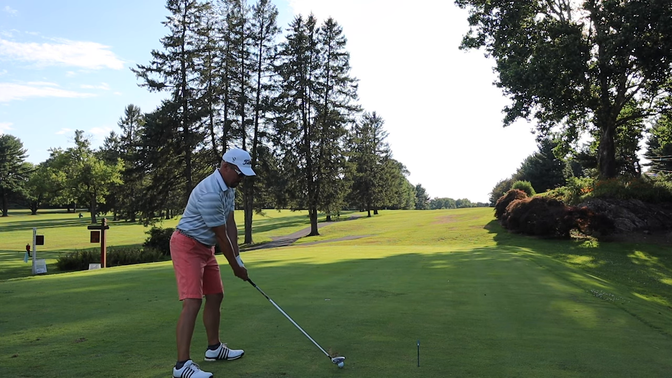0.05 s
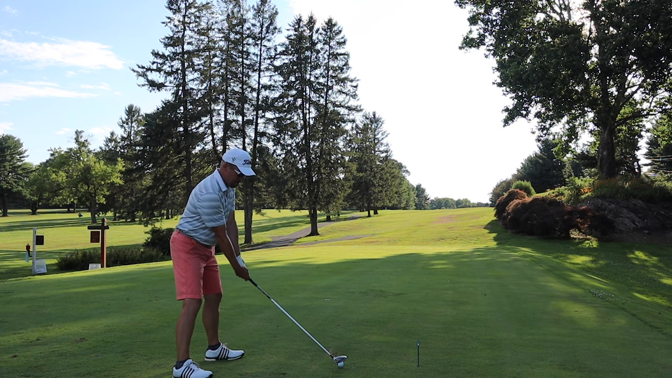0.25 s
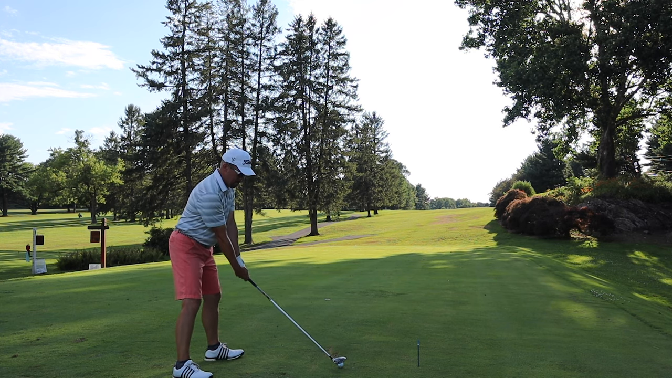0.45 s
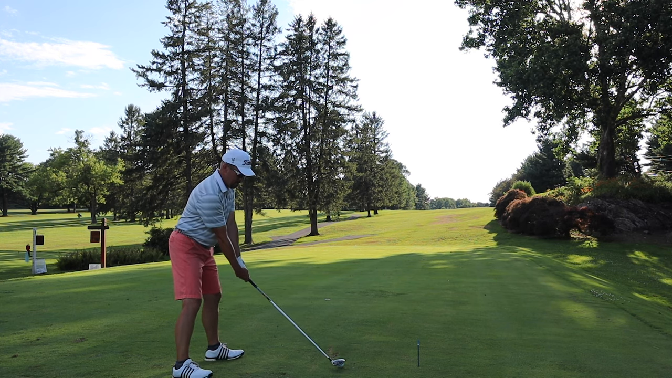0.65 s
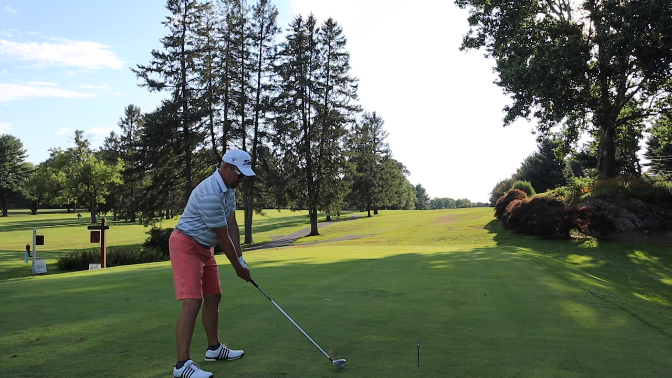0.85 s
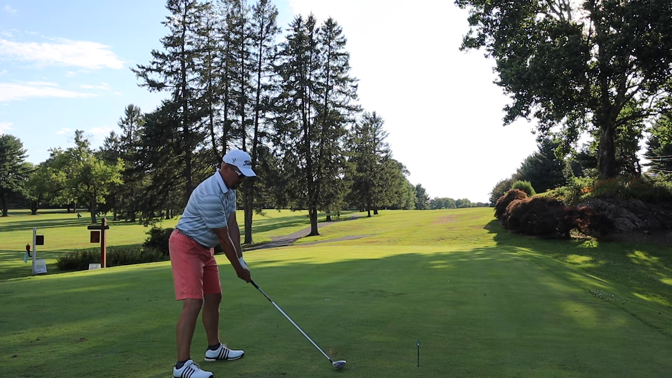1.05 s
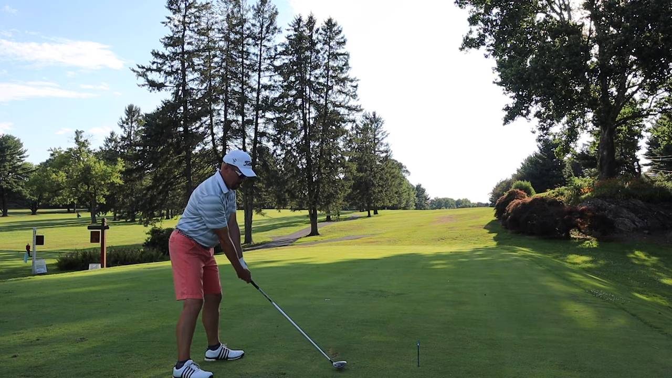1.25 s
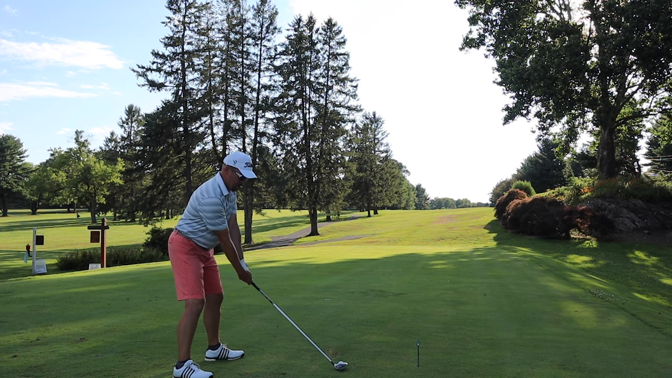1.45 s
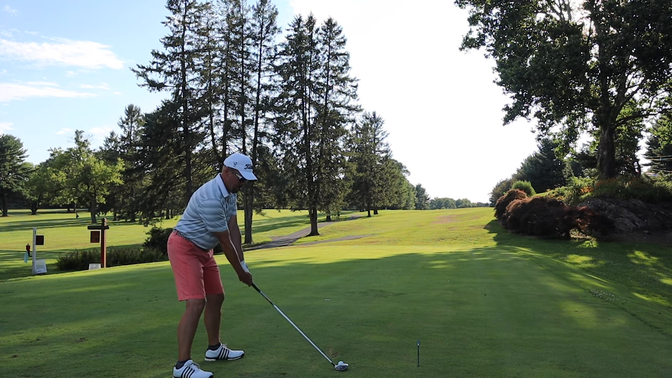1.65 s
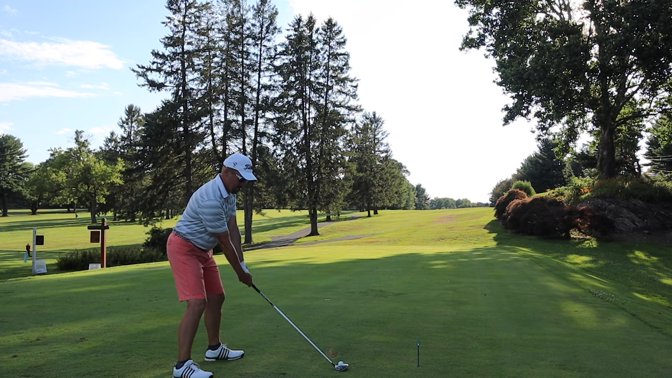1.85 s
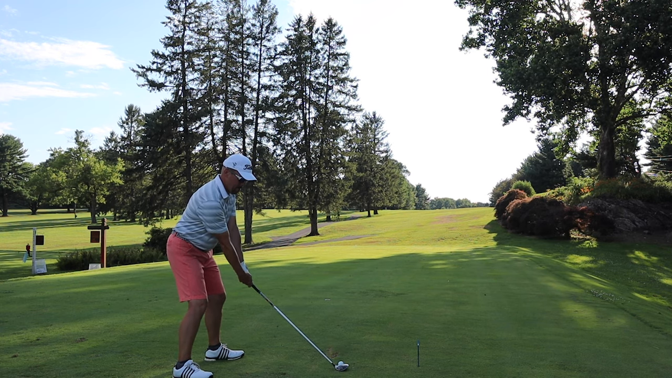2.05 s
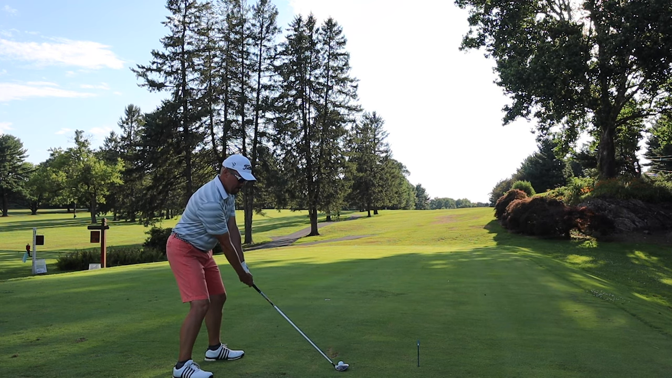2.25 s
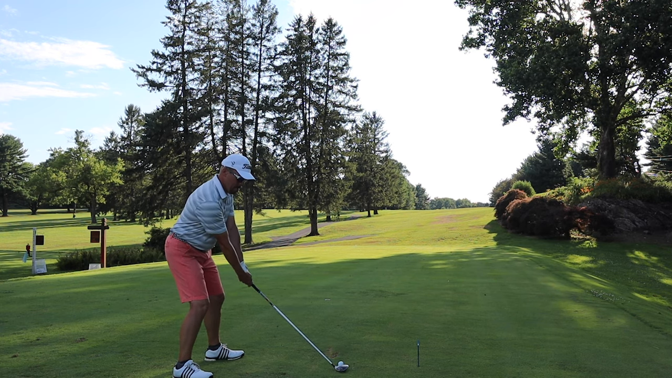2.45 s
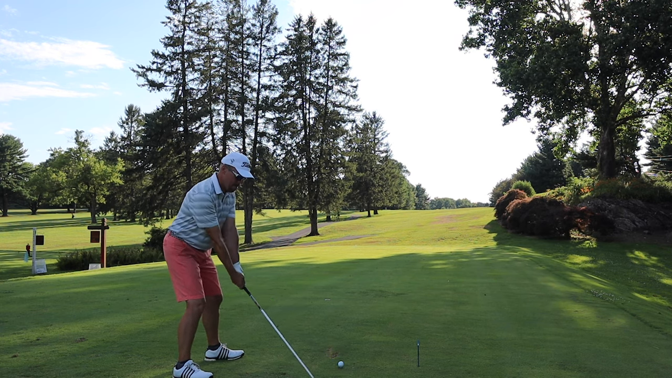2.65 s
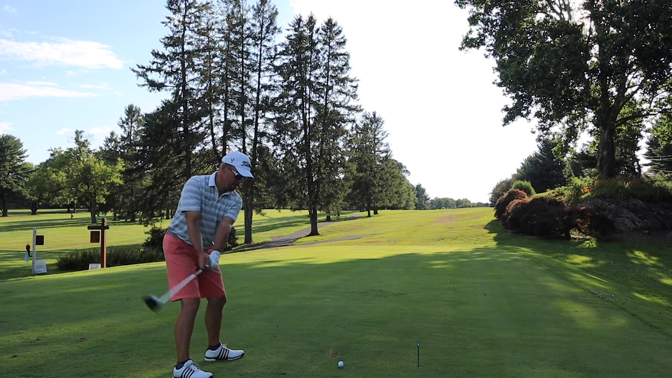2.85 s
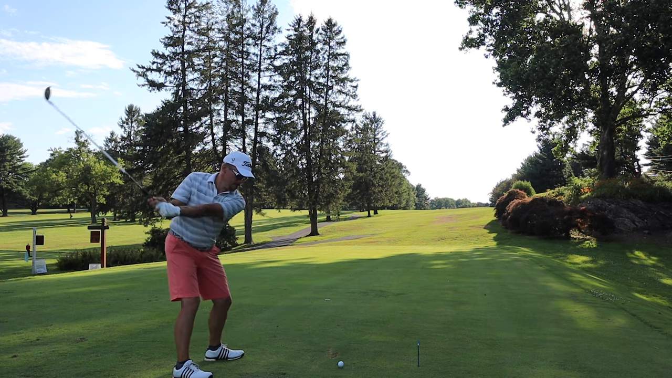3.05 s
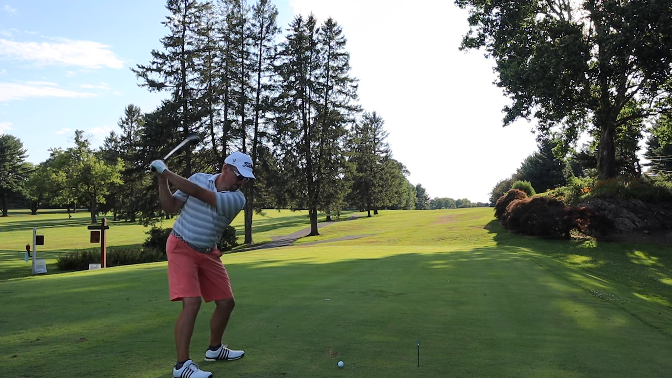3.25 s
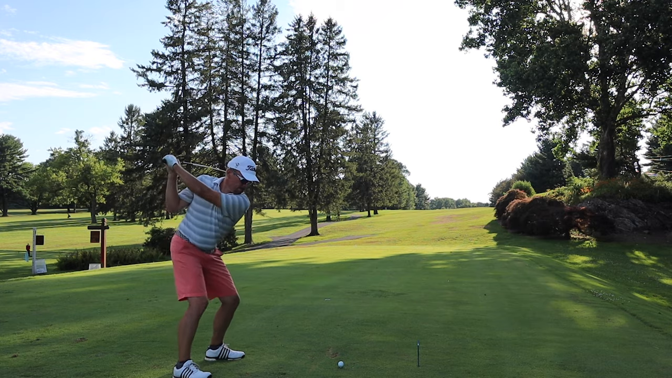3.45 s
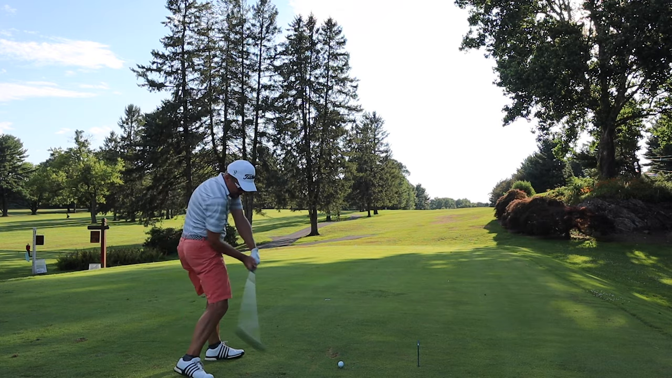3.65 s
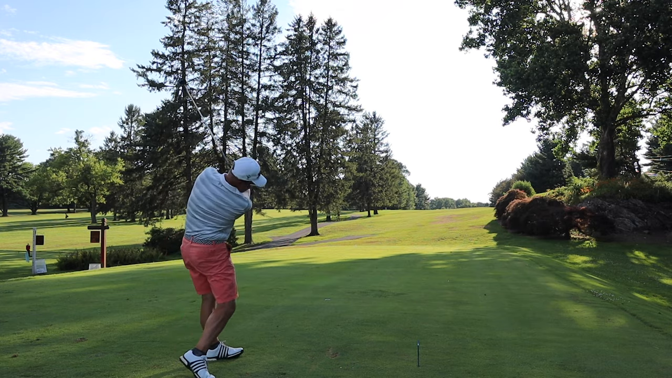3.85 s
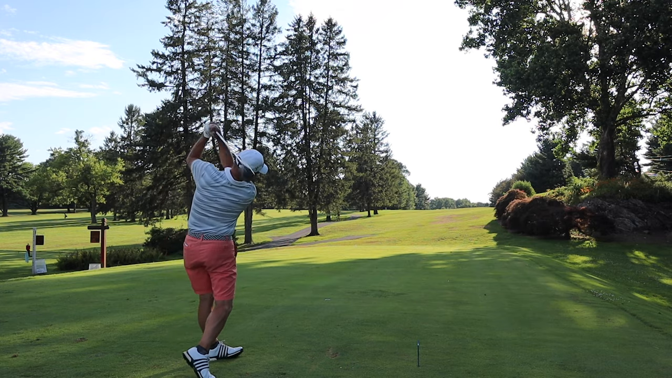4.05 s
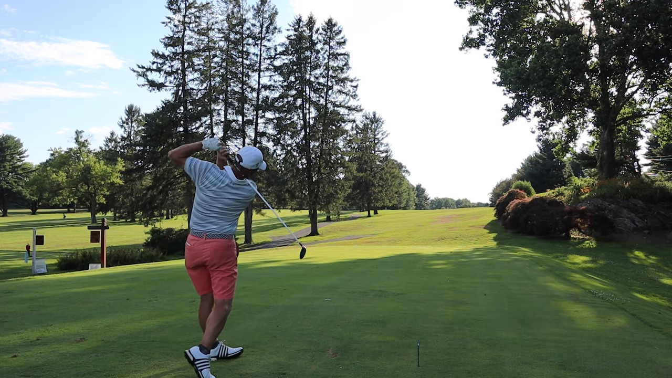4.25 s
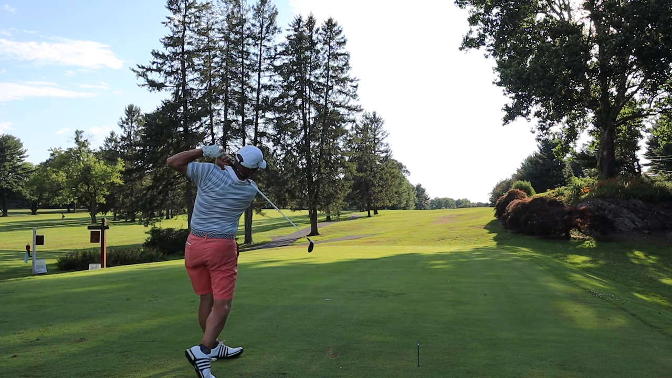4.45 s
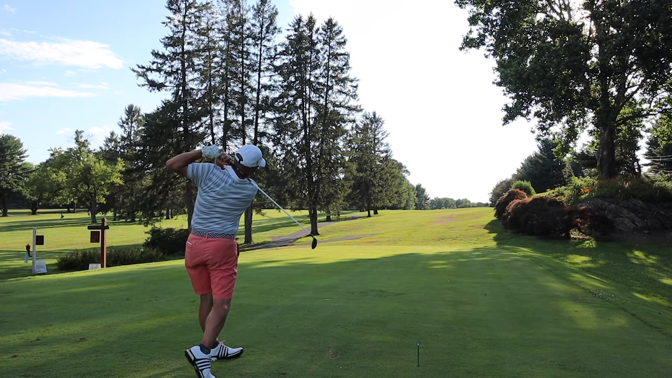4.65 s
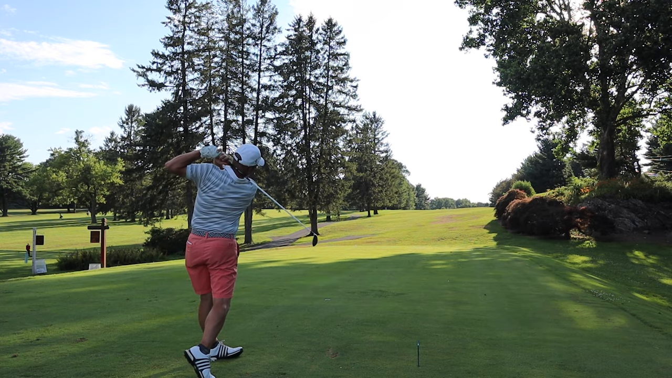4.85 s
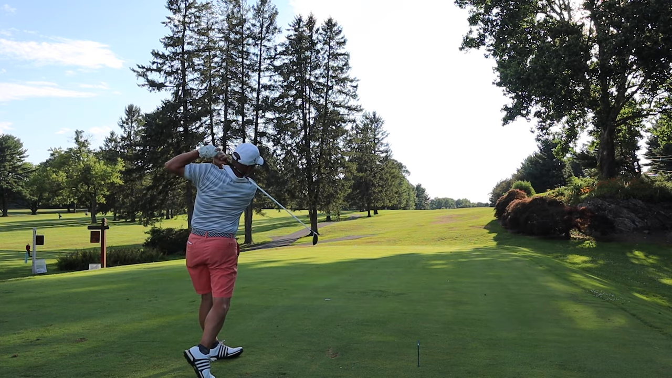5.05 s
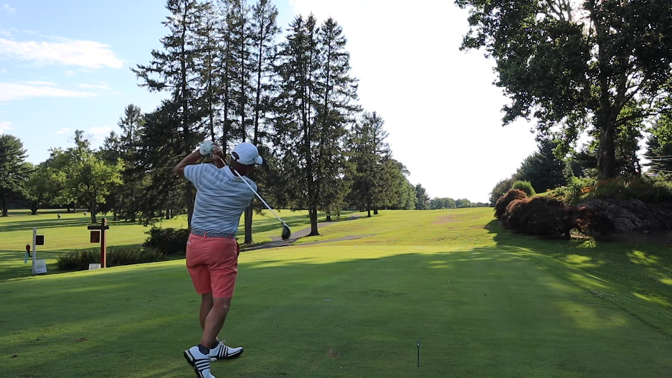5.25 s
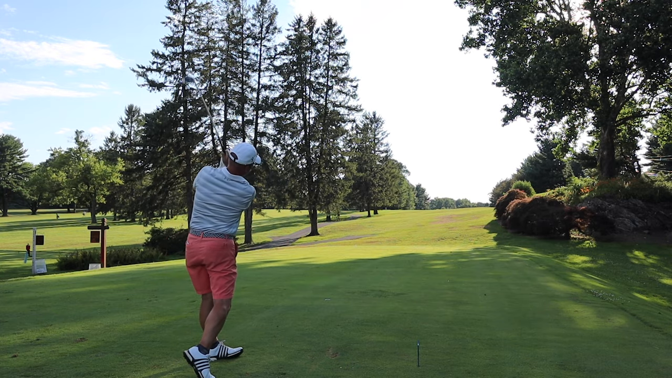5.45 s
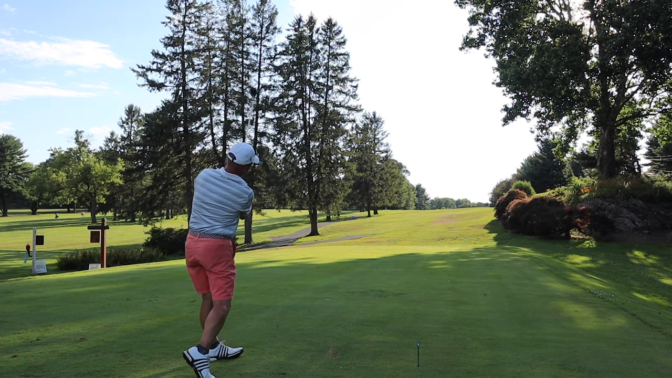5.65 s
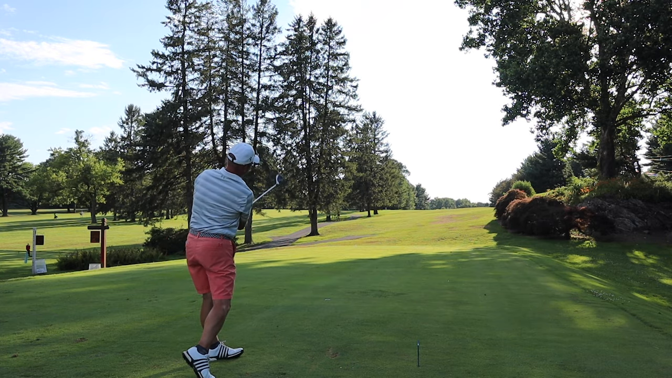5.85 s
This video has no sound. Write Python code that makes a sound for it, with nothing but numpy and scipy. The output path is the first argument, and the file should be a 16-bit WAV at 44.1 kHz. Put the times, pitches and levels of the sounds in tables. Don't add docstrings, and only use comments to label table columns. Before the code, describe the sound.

A quiet open golf course, heard through a camera microphone a few metres from the player. A soft, low-heavy wash of distant traffic and slight hiss runs throughout. Far birds chirp faintly, with one nearer kind giving slurred, downward whistles of about 0.3 seconds at 0.4, 0.8, 1.0 and 1.4; a quick bright chirp also comes near 1.5. At 1.2 the club head taps the turf with a tiny double bounce and dull ring. From 1.6 to 3.3 a faint far engine wavers upward in pitch, then disappears. A dry tick of shoes or clothes comes at 3.3. Around 3.72 a whistling swish rises rapidly, ending at 3.8 in a very loud, sharp crack with short, bright metallic ringing. Trees return a crisp scattered echo lasting a few tenths of a second, while the background ducks momentarily. A slurred whistle follows at 3.9, another at 4.8, with small chirps and a faint tick near 5.6.

```python
import sys
import numpy as np
from scipy import signal
from scipy.io import wavfile
from scipy.ndimage import uniform_filter1d

SR = 44100
rng = np.random.default_rng(int(sys.argv[2]) if len(sys.argv) > 2 else 0)


def volts(x):
    e = np.asarray(x, float) / 20
    return 10 ** e


def wrap_up_sound(samples):
    columns = np.atleast_2d(samples).T
    tamed = np.clip(columns, -1, 1)
    steps = np.round(tamed * 32767).astype(np.int16)
    wavfile.write(sys.argv[1], SR, steps)


N = 260631
BLOW_S = 3.8078


def evened(x):
    return x / np.sqrt(np.mean(x ** 2) + 1e-20)


def wander(length, size):
    once = uniform_filter1d(rng.standard_normal(length), size=size)
    return evened(uniform_filter1d(once, size=size))


def read(points, hz):
    f, value = np.transpose(points)
    return np.interp(np.log(hz + 1), np.log(f + 1), value)


def curves(rows):
    s, *columns = np.transpose(rows)
    t = np.arange(s[0], s[-1], 1 / SR)
    return s[0], [np.interp(t, s, c) for c in columns]


def add(mix, s, sound):
    part = mix[round(s * SR):][:len(sound)]
    part += sound[:len(part)]


def colour(points):
    hz = abs(np.fft.fftfreq(4096, 1 / SR))
    log_gain = np.log(volts(np.maximum(read(points, hz), -90)))
    return np.fft.ifft(np.exp(np.conj(signal.hilbert(log_gain)))).real[:2048]


def resonate(x, hz, width_hz):
    turn = np.exp(2j * np.pi * np.cumsum(hz * np.ones(len(x))) / SR)
    r = np.exp(-np.pi * width_hz / SR)
    return 2 * (turn * signal.lfilter([1 - r], [1, -r], x / turn)).real


def ring(modes, rise_s):
    t = np.arange(4000) / SR
    sound = 0
    for k, (hz, db, t60) in enumerate(modes):
        sound = sound + (-1) ** k * volts(db - 60 * t / t60) * np.sin(2 * np.pi * hz * t)
    sound = sound * (1 - np.exp(-(t / rise_s) ** 2))
    return sound / abs(sound).max()


# (frequency [Hz], level [dB per Hz])
WASH_SPECTRUM = [(12, -61), (20, -36), (26, -34), (43, -28), (90, 1), (192, -4.5), (247, -8.5), (284, -8.5),
                 (356, -16), (387, -11), (1250, -12.5), (3140, -25), (3930, -28.5), (6690, -30),
                 (15900, -38.5)]


def wash(level_db=-60, patchy_db=1.12, swell_db=0.18):
    frames, hz = N // 256 + 5, np.fft.rfftfreq(1024, 1 / SR)
    a, b, patches = rng.standard_normal((frames, 513, 3)).T
    patches = uniform_filter1d(patches, size=10, axis=0)
    patches = evened(uniform_filter1d(patches, size=14, axis=1))
    swell = evened(uniform_filter1d(rng.standard_normal(frames), size=40))
    level = read(WASH_SPECTRUM, hz)[:, None] + patchy_db * patches + swell_db * swell
    noise = signal.istft((a + 1j * b) * volts(level), nperseg=1024, noverlap=768)[1][:N]
    return volts(level_db) * evened(noise)


# (time [s], firing rate [Hz], level [dB])
ENGINE_RUN = [
    (1.6, 161, -77),
    (2.05, 168, -68),
    (2.4, 183, -73),
    (2.8, 196, -70),
    (3.15, 204.8, -71),
    (3.3, 205, -88),
]


def engine():
    s, (hz, db) = curves(ENGINE_RUN)
    hz = hz * (1 + 0.018 * wander(len(hz), size=3000))
    level = np.sqrt(2) * volts(db + 5.3 * wander(len(hz), size=2500))
    return s, level * np.sin(2 * np.pi * np.cumsum(hz) / SR)


def bird(s, hz, db):
    flutter_db = 2.6 * wander(16000, size=350)
    fade = signal.windows.tukey(len(hz), min(.35, 2000 / len(hz)))
    note = volts(db + flutter_db[:len(hz)]) * np.sin(2 * np.pi * np.cumsum(hz) / SR) * fade
    leaves = rng.standard_normal(6000) * volts(-60 * np.arange(6000) / SR / .35)
    echo = signal.oaconvolve(note, leaves / np.linalg.norm(leaves))
    echo = volts(-5.5) * echo / np.linalg.norm(echo) * np.linalg.norm(note)
    add(echo, 0, note)
    return s, np.sqrt(2) * echo


def chirp(s, length, first_hz, last_hz, db):
    u = np.linspace(0, 1, round(length * SR))
    bend = 3.5 if last_hz > first_hz else 1
    return bird(s, last_hz + (first_hz - last_hz) * (1 - u) ** bend, db)


def chatter(count=40, level_db=-85):
    calls = []
    for when, pitch, turn, length, loud in rng.random((count, 5)):
        hz = 2500 + 1700 * pitch ** 1.5
        glide = 1 + .25 * (turn - .6)
        calls.append(chirp(when * N / SR, 0.022 + 0.06 * length, hz, hz * glide, level_db + 2.9 * loud))
    return calls


# (time [s], length [s], first pitch [Hz], last pitch [Hz], level [dB])
CHIRP_CALLS = [(0.036, .04, 4780, 4650, -79), (0.18, 0.017, 3220, 3260, -79), (0.5, 0.02, 6810, 6740, -72),
               (0.569, .019, 6200, 6840, -70.5), (.62, .045, 4450, 4250, -81),
               (.663, 0.044, 4040, 4000, -78), (1.471, 0.016, 5080, 6340, -60.5),
               (1.475, .022, 7430, 7450, -68.5), (1.52, 0.025, 7430, 7480, -86),
               (1.60, .042, 4900, 4800, -81), (1.68, .037, 5200, 5060, -79),
               (1.954, 0.036, 3420, 3720, -73), (2.96, 0.038, 3050, 3200, -80),
               (3.1, 0.025, 3700, 2860, -75), (3.309, 0.025, 3110, 3100, -74.5),
               (4.61, .04, 4000, 3680, -75), (4.66, .023, 4680, 4580, -78), (4.74, .03, 4560, 4500, -79.5),
               (4.866, .025, 4300, 3600, -79), (5.09, .03, 3020, 3220, -78), (5.49, .06, 2650, 2340, -81),
               (5.68, .08, 3110, 3020, -83.5)]


def chirps():
    return [chirp(*row) for row in CHIRP_CALLS]


def slur(s, length, top_hz, db, swell_db):
    u = np.linspace(0, 1, round(length * SR))
    scoop = .09 * np.exp(-u * length / .015)
    slide = .125 * u ** 1.5
    closed = 1 / (1 + np.exp((u - .56) / .025))
    return bird(s, top_hz * (1 - scoop - slide), db - swell_db * closed)


# (time [s], length [s], top pitch [Hz], level [dB], swell [dB])
SLUR_CALLS = [
    (.40, .29, 3550, -75.5, 0),
    (.80, .31, 3440, -66.5, 10),
    (1.02, .32, 3560, -79.5, -3),
    (1.395, .285, 3480, -69, 14),
    (3.94, .32, 3560, -73, 8),
    (4.785, .31, 3600, -71, 4),
]


def slurs():
    return [slur(*row) for row in SLUR_CALLS]


def tick(s, db, dull_hz, bright_hz):
    burst = rng.standard_normal(300) * np.exp(-np.arange(300) / SR / 0.00115)
    band = signal.butter(2, [dull_hz, bright_hz], "band", fs=SR, output="sos")
    burst = signal.sosfilt(band, burst)
    return s, volts(db) * burst / abs(burst).max()


# (time [s], peak level [dB], dullest [Hz], brightest [Hz])
TICK_EVENTS = [
    (1.2270, -52, 1800, 8000),
    (3.2765, -46, 1000, 6800),
    (3.5000, -54, 3100, 11000),
    (3.7145, -52, 4000, 15000),
    (3.9692, -43, 2500, 5200),
    (5.5800, -53, 2000, 5500),
]


def ticks():
    return [tick(*row) for row in TICK_EVENTS]


# (time [s], peak level [dB])
TAP_EVENTS = [
    (1.2266, -42),
    (1.2339, -40),
    (1.2463, -47),
]
# (frequency [Hz], level [dB], t60 [s])
TAP_MODES = [(352, 0.5, 0.12), (557, -10, 0.064), (384, -11, 0.062), (1066, -1, 0.017), (714, -3.5, 0.021)]


def taps():
    return [(s, -volts(db) * ring(TAP_MODES, 0.00034)) for s, db in TAP_EVENTS]


def row_of_trees(t, distance_m, depth_m, db, swell_db, t60):
    sound_m_s, front_s = 343., .06
    front, back = 2 * distance_m / sound_m_s, 2 * (distance_m + depth_m) / sound_m_s
    times = [front - front_s, front, back, back + t60]
    shape_db = np.interp(t, times, [-60 - swell_db, -swell_db, 0, -60])
    return volts(db + shape_db) ** 2 * (t > front - front_s)


# (frequency [Hz], level [dB per Hz])
NEAR_LEAVES = [(1180, -36), (2000, -17), (2560, -19), (2890, -18), (3040, -9), (3800, -7.5), (4670, -5.5),
               (5500, -2.5), (6870, -3.5), (8290, -1), (10400, -5.5), (11800, -10), (15500, -35.5)]
FAR_LEAVES = [(1180, -20), (2000, -13), (2140, -22), (2700, -14), (2940, -11), (3340, -4.5), (3640, -8),
              (3970, 3), (5050, -7), (5500, -2), (5800, -4), (6250, 3), (7050, -11), (8660, -1),
              (9930, -20.5), (10800, -21), (15500, -47)]
# (distance [m], depth [m], level at the back [dB], swell front to back [dB], t60 behind [s])
NEAR_TREES = [
    (1, .3, -31.5, 0.5, .05),
    (6, 12, -39.5, 4, 0.15),
    (24, 9.4, -59, -1, .3),
]
FAR_TREES = [
    (34.6, 1.9, -45.5, 7, .25),
    (39.4, 6.4, -45.5, 14, 0.055),
    (48, 4.8, -55.5, -4.5, 0.41),
]


def trees():
    t = np.arange(.006, .6, 1 / SR)
    sign, chance, size = rng.random((len(t), 3)).T
    struck = chance < 9000 / SR
    returns = np.sign(sign - .5) * struck * volts(-1.5 * np.log(size + 1e-3))
    echo = 0
    for spectrum, rows in ((NEAR_LEAVES, NEAR_TREES), (FAR_LEAVES, FAR_TREES)):
        click = colour([(1200, -47.5), *spectrum])
        leaves = evened(signal.oaconvolve(returns, click)[:len(t)])
        echo = echo + leaves * np.sqrt(sum(row_of_trees(t, *row) for row in rows))
    return BLOW_S + t[0], echo


# (time [s], club speed [m/s], shaft whistle level [dB])
DOWNSWING = [
    (3.69, 26.3, -82),
    (3.722, 27.7, -53.5),
    (3.743, 33, -39.5),
    (3.752, 37, -30),
    (3.770, 43, -24.5),
    (3.780, 36.4, -29.5),
    (3.787, 43, -24),
    (3.801, 39, -26),
    (3.813, 30, -48),
]
# (frequency [Hz], level [dB per Hz])
HEAD_HISS = [(760, -34), (1300, -6.5), (1690, -2), (2020, -8.5), (2240, -5), (2620, -11), (3620, -4),
             (4510, -8.5), (6570, -16), (8620, -10.5), (10200, -27.5), (13600, -25), (15800, -36.5)]


def swing():
    s, (speed, whistle_db) = curves(DOWNSWING)
    strouhal, shaft_m = .2, .011
    hz, t = strouhal * speed / shaft_m, np.arange(len(speed)) / SR
    trailing_db = np.interp(t - 0.003002, t, uniform_filter1d(whistle_db, size=400))
    after_blow_s = np.maximum(s + t - BLOW_S, 0)
    hiss_db = -36.5 + 0.95 * (trailing_db - whistle_db.max()) - 60 * after_blow_s / .015
    phase = 2 * np.pi * np.cumsum(hz * (1 + .12 * wander(len(hz), size=70))) / SR
    shedding = np.sqrt(2) * (np.sin(phase) + volts(-22.5) * np.sin(2 * phase))
    air = rng.standard_normal((3, len(hz)))
    wake = evened(resonate(resonate(air[0], hz, 400.), hz, 400.))
    hosel_hz = .6 * hz
    flutter = evened(resonate(resonate(air[1], hosel_hz, 250.), hosel_hz, 250.))
    hiss = evened(signal.oaconvolve(air[2], colour(HEAD_HISS))[:len(hz)])
    whistle = volts(-2.5) * shedding + volts(-11.5) * wake + volts(-11.5) * flutter
    return s, volts(whistle_db) * whistle + volts(hiss_db) * hiss


# (frequency [Hz], level [dB], t60 [s])
HEAD_MODES = [(230, -30, .03), (690, -27, .015), (1990, -27.5, .012), (2970, -19.5, 0.025),
              (4020, -11.5, .018), (4430, -20.5, 0.014), (4750, -14, 0.024), (5165, -26.5, .035),
              (5700, -31, 0.022), (6200, -31, .015), (7075, -23, .02), (7330, -13, .026), (7750, -14, .014),
              (8067, -4.5, .017), (8660, -17.5, .023), (8960, 1, .016), (9650, -21.5, .016),
              (10300, -21.5, 0.0069), (11530, -25, .014), (12000, -28.5, 0.017), (12520, -23, 0.023),
              (12900, -22.5, .008), (15020, -25.5, .008)]
# (frequency [Hz], level [dB per Hz])
SNAP_SPECTRUM = [(30, -55.5), (110, -14.5), (300, -3.5), (800, -8), (1400, -16), (1950, 2.5), (2550, -9),
                 (4300, -4.5), (6300, -14), (9000, -9), (12000, -2.5), (15200, -7.5), (16200, -21)]


def crack():
    k = np.arange(60)
    contact = rng.standard_normal(60) * volts(-k * .5) * .17 + (k == 0)
    snap = np.pad(np.convolve(colour(SNAP_SPECTRUM), contact)[:2048], (26, 1926))
    snap = -volts(-4.0) * snap / abs(snap).max()
    t = np.arange(900) / SR
    scatter = rng.standard_normal(900) * volts(-29.5 - 60 * t / 0.017) * (t > .0004)
    treble = signal.lfilter([1, -.9], 1, snap)
    scattered = np.convolve(treble, scatter)[:len(snap)]
    return BLOW_S - .0002, volts(3.5) * (ring(HEAD_MODES, 0.00085) + snap + scattered)


def scene():
    mix, club = wash(), np.zeros(N)
    add(mix, *engine())
    for sound in chatter() + chirps() + slurs() + ticks():
        add(mix, *sound)
    for sound in taps() + [trees(), swing(), crack()]:
        add(club, *sound)
    no_bass = signal.butter(2, 120, "high", fs=SR, output="sos")
    return (mix + signal.sosfilt(no_bass, club))[None]


def top_cut(x):
    return signal.sosfilt(signal.butter(12, 16050, fs=SR, output="sos"), x)


# (frequency [Hz], gain [dB])
MIC_RESPONSE = [(10, -16.5), (45, -7.5), (70, -6), (110, 2.5), (15000, -0.5), (15800, 1), (16500, -18)]


def record(dry):
    dry = signal.oaconvolve(dry, colour(MIC_RESPONSE)[None])[:, :N]
    power_db = 10 * np.log10(abs(uniform_filter1d(dry[0] ** 2, size=60)) + 1e-12)
    fall = np.arange(N) * 120.0 / SR
    held_db = np.maximum.accumulate(power_db + fall) - fall
    over_db = np.maximum(held_db + 17.4, 0)
    lag = np.exp(-1 / (0.012 * SR))
    ducked = dry / volts(0.92 * signal.lfilter([1 - lag], [1, -lag], over_db))
    return top_cut(np.clip(ducked, -1, 1))


dry = scene()
out = record(dry)
wrap_up_sound(out)
```